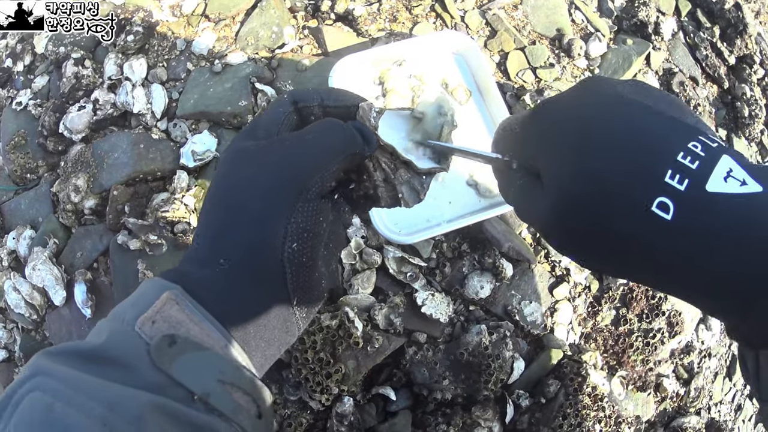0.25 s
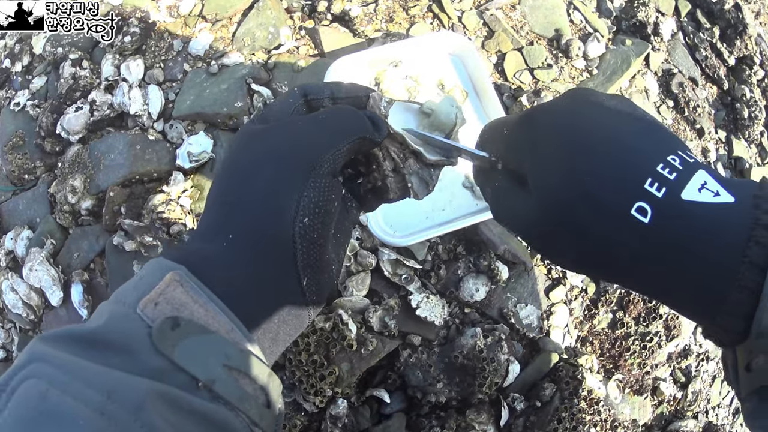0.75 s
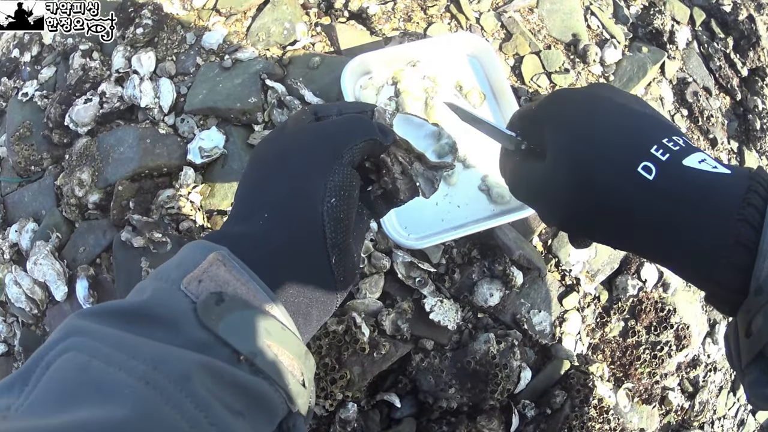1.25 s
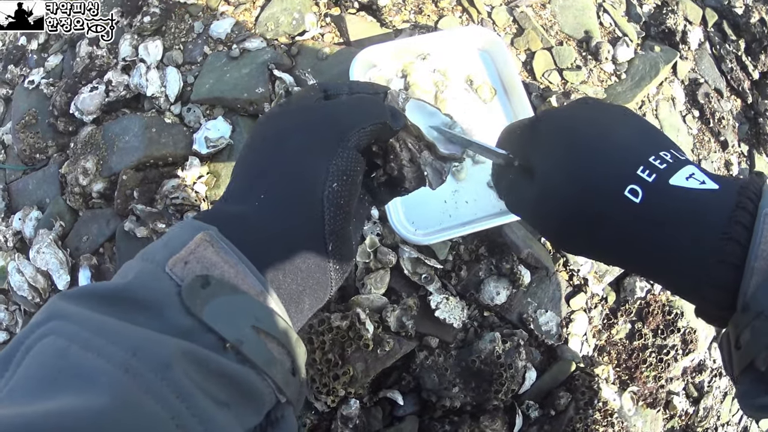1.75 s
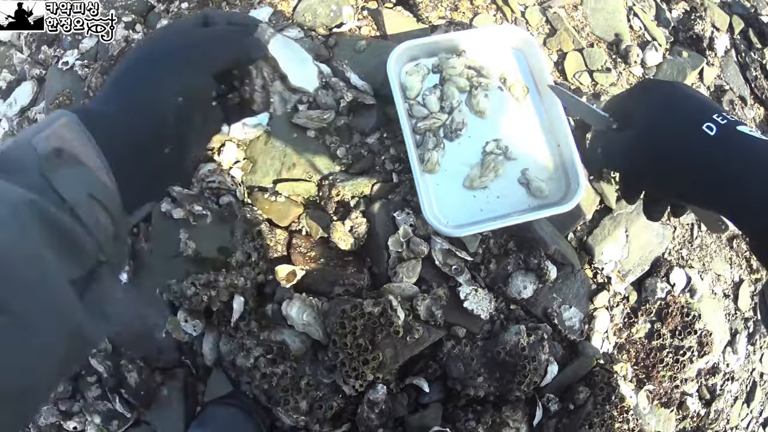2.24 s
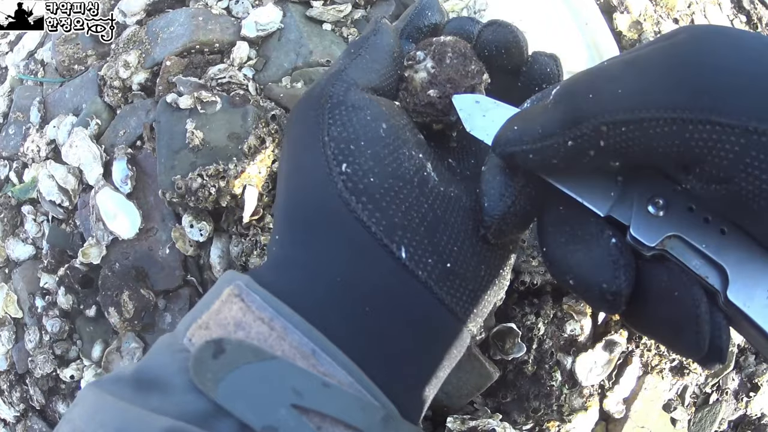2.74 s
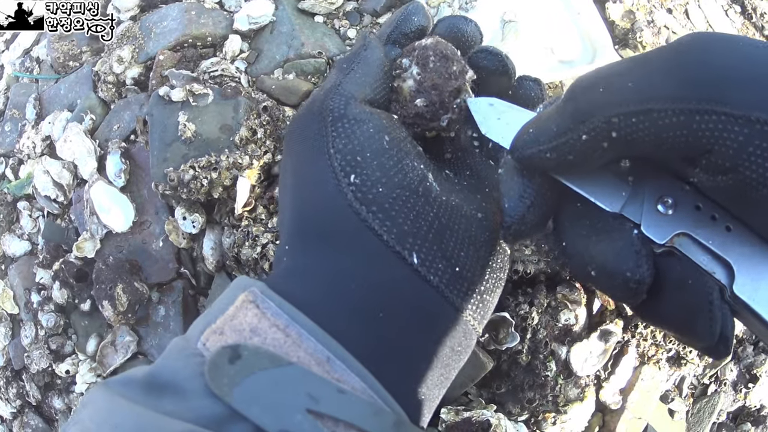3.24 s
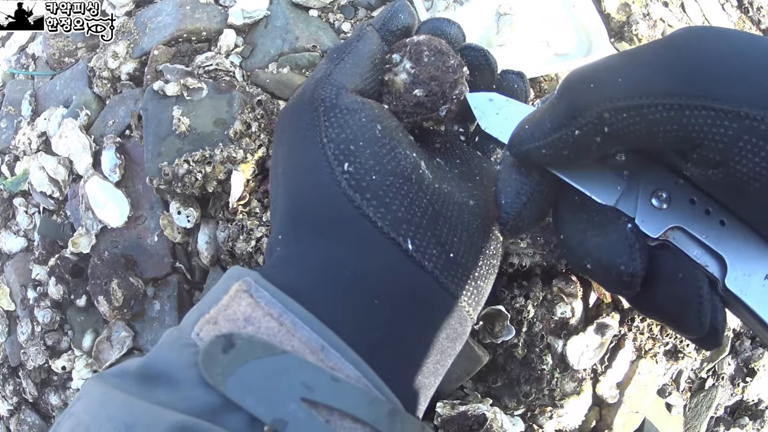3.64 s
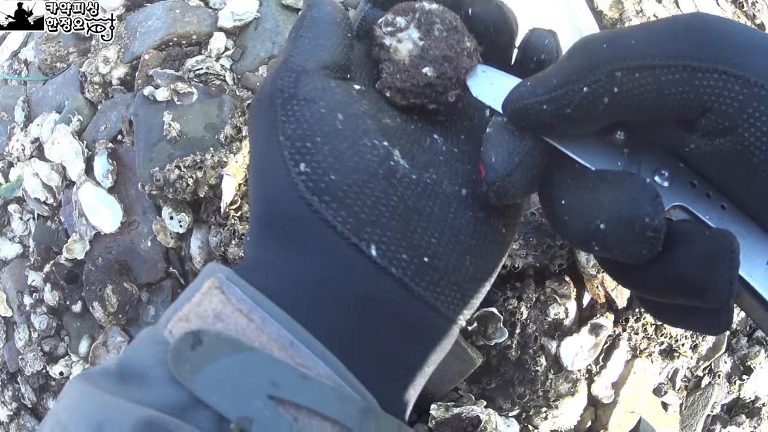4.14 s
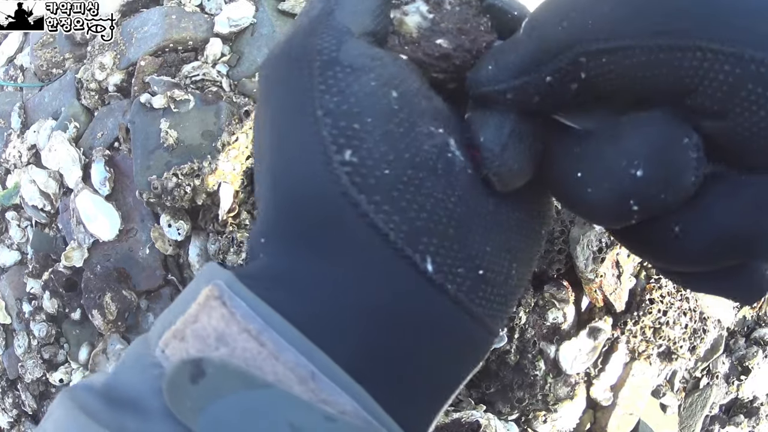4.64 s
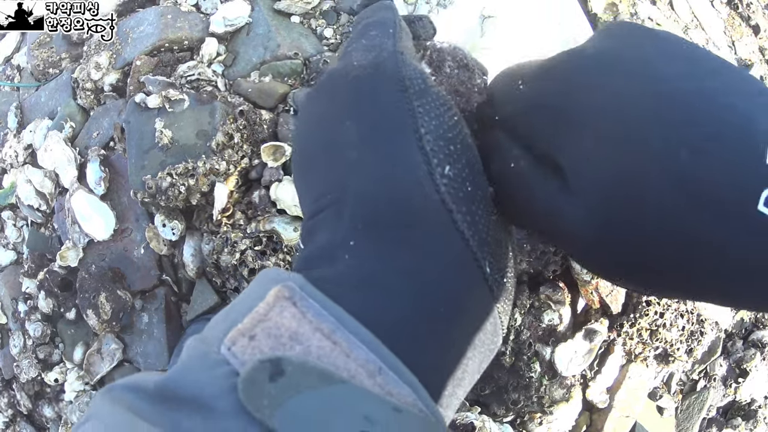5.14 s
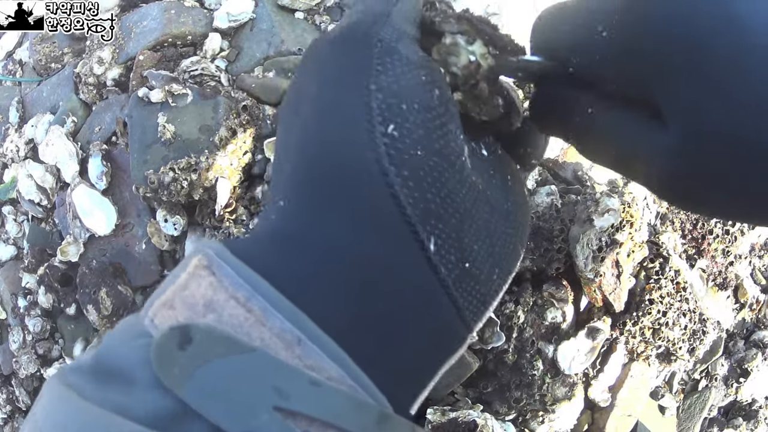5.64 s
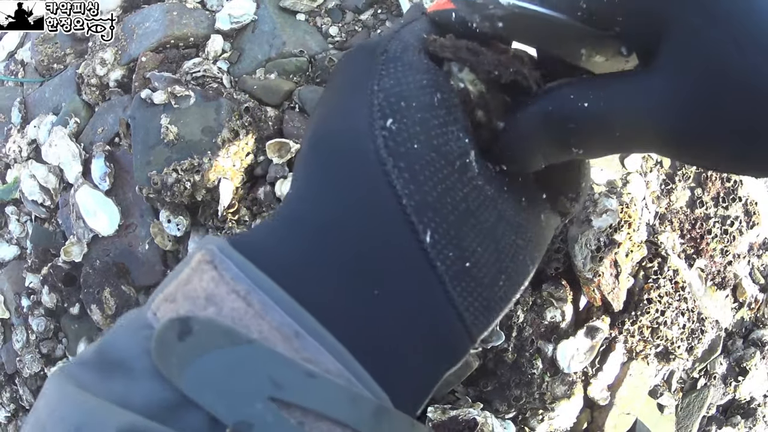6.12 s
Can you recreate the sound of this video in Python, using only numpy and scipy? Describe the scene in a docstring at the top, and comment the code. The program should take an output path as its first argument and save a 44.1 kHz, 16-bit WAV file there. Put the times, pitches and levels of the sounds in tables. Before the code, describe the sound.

On a quiet rocky shore, heard very close, a blade scrapes and taps inside an open oyster shell in bright, irregular bursts. Wet meat pats softly into a plastic tub. A stiff sleeve swishes by with a brief rising zip. After a near-silent pause, the knife tip grinds another shell's edge, with brittle cracks and gritty crumbling growing dense. Low outdoor rumble, thin hiss and a faint engine hum lie behind.

```python
"""A knife blade scrapes and taps inside an open oyster shell, close to a body-worn camera on a quiet rocky shore.
Bits of wet meat slap into a plastic tub, then a sleeve swishes past as the hand fetches the next oyster, whose
brittle lip cracks and crumbles under the knife tip. Knife sounds are sharp pushes or friction slips sent through
shell resonances; the tub is a set of damped modes; sleeve and gloves are moving noise, the sleeve with a rising zip.
Behind lie short scatter from nearby stones, a low outdoor rumble with thin hiss, and the hum of a far engine."""
import sys
import numpy as np
from scipy import signal
from scipy.fft import rfft, irfft, next_fast_len
from scipy.io import wavfile
from scipy.ndimage import uniform_filter1d, map_coordinates

SR = 44100
rng = np.random.default_rng(int(sys.argv[2]) if len(sys.argv) > 2 else 0)


def inscribe(sig):
    """Save sig as 16-bit PCM at rate SR to the path in sys.argv[1].

    A 1-D sig is mono; a 2-D sig holds one channel per row.
    Samples are clipped to [-1, 1] before scaling.
    """
    pcm = np.round(np.clip(np.atleast_2d(sig).T, -1, 1) * 32767)
    wavfile.write(sys.argv[1], SR, pcm.astype(np.int16))


N = 281358
TIME = np.arange(N) / SR

# the tip crushes the lip: hardest_push_s, length_s, level_db (ahead of the crumble's cut), bright_db, ring_hz
GRINDS = [(3.21, .115, -42.5, -3.5, 2090), (3.33, .04, -37.5, -0.5, 4950), (3.39, .11, -44, -8, 4460),
          (3.5, .04, -45.5, -2.5, 3650), (3.803, .03, -40, -9, 4540), (3.868, .045, -43, -10, 830),
          (3.945, .052, -39, -5, 2800), (4.02, .09, -38, -2, 4290), (4.155, .08, -42.5, -5.5, 2770),
          (4.32, .12, -36.5, -5, 5300), (4.393, .024, -28.5, -7, 5360), (4.445, .13, -32.5, -2, 5040),
          (4.52, .05, -36.5, -1, 5800), (4.631, .09, -27, 0, 2370), (4.845, .09, -38, -5, 1420),
          (4.93, .15, -42, -1, 2590), (5.07, 0.069, -30.5, -0.5, 2520), (5.103, .024, -24.5, -1.5, 1660),
          (5.316, .085, -27.5, -1.5, 1830), (5.39, .1, -31.5, -1.5, 2030), (5.504, .028, -31.5, -3.5, 3650),
          (5.574, .042, -21, -4.5, 1857), (5.616, .062, -31, -7, 5950), (5.712, .082, -33.5, -5, 6200),
          (5.768, .036, -35, -9.5, 1740), (5.832, 0.02, -29, 4, 3460), (6.17, .1, -36, -7.5, 4980),
          (6.305, .038, -35, -3, 1520), (6.35, .056, -25, -0.5, 7860)]
# body colour of the closed oyster: frequency_hz, gain_db
SOLID = [(380, -7.5), (750, -3), (1000, -2), (1500, 1), (2000, 2.5), (2700, 3), (3500, -2.5), (4100, 1),
         (4600, -0.5), (5500, 0.5), (6500, -1), (8200, 3), (11000, -1.5)]
# wet gloves shift on the shell: time_s, grip_db (ahead of the gains of rustle and grit)
GRIP = [(0, -54), (1, -52.5), (1.3, -57), (3.45, -54), (3.72, -62), (4.2, -47), (4.45, -42), (4.57, -48),
        (4.72, -43.5), (5.17, -41.5), (5.55, -48), (6, -49), (6.38, -39)]


def amp(db):
    """Decibels to gain."""
    return 10 ** (np.asarray(db) / 20)


def unit(x):
    """Scale to rms 1."""
    return x / np.sqrt(np.mean(x ** 2) + 1e-20)


def along(points, hz):
    """(Hz, value) points read on a log frequency axis."""
    point_hz, value = np.transpose(points)
    return np.interp(np.log(hz + 1), np.log(point_hz + 1), value)


def curves(rows):
    """One value per sample for each column after the time."""
    s, *columns = np.transpose(rows)
    return [np.interp(TIME, s, column) for column in columns]


def wobble(rate):
    """A smooth random curve, rate knots a second."""
    knots = rng.standard_normal(int(N * rate / SR) + 4)
    return map_coordinates(knots, [TIME * rate])


def filtered(x, gain):
    """x times a gain that depends on frequency."""
    size = next_fast_len(N + 8192)
    hz = np.fft.rfftfreq(size, 1 / SR)
    return irfft(rfft(x, size) * gain(hz), size)[..., :N]


def noise(spectrum, side_db):
    """Coloured stereo noise of rms 1, wider with more side_db."""
    mid, side = filtered(rng.standard_normal((2, N)), lambda hz: amp(along(spectrum, hz)))
    side = amp(side_db) * side
    return unit(np.array([mid + side, mid - side]))


def pan(left_db):
    """Channel gains for a level lead of the left side."""
    return amp([[left_db / 2], [-left_db / 2]])


def add(track, s, sound):
    """Mix a sound into a track at time s."""
    part = track[max(round(s * SR), 0):][:len(sound)]
    part += sound[:len(part)]


def shell(force, body, knock_db, bright_db, ring_hz, ring_db, width_hz, ripple_db, size=2048):
    """The shell answers a force with its body colour, one main ring and lesser modes that differ from spot to spot."""
    hz = np.fft.rfftfreq(size, 1 / SR)
    contact = [(100, -45), (430, knock_db - 14.0), (800, knock_db - 3.0), (1400, knock_db + 0.5),
               (2400, -3.5), (5800, -1), (8000, bright_db), (11000, bright_db - 1.0), (13000, -4.5)]
    resonance = amp(ring_db) / np.hypot(1, 2 * (hz - ring_hz) / width_hz) ** 2
    ring = 20 * np.log10(1 + resonance)
    lesser = ripple_db * map_coordinates(rng.standard_normal(size), [hz / width_hz * 2])
    # folding the cepstrum makes the answer causal, with minimum phase
    cepstrum = irfft(np.log(amp(along(body, hz) + along(contact, hz) + ring + lesser)))
    cepstrum[1:size // 2] *= 2
    cepstrum[size // 2 + 1:] = 0
    # bending waves carry the treble a little ahead of the bass
    bending = np.exp(-.22j * np.sqrt(hz))
    answer = irfft(np.exp(rfft(cepstrum)) * bending)
    return signal.fftconvolve(force, answer)


def blow(chatter, t60, size=1024):
    """One sharp push with quickly dying chatter of the contact."""
    tail = rng.standard_normal(size) * amp(-60 * np.arange(size) / SR / t60)
    force = chatter * tail / np.linalg.norm(tail)
    force[0] += 1
    return force


def at_level(click, db):
    """Give a click its rms level, its energy counted over 5 ms."""
    return click / np.linalg.norm(click) * amp(db) * np.sqrt(.005 * SR)


def strokes(rows, body, rise_share, knock_db, knock_per_bright, slips_per_s, spread_db, rub, ring_db, width_hz):
    """Tiny slips over a smooth rub swell and fade with the push; the brighter a stroke, the less it knocks."""
    out = np.zeros(N)
    for s, length, db, bright_db, ring_hz in rows:
        rise, fall = length * rise_share, length * (1 - rise_share)
        start = max(s - 1.25 * rise, 0)
        t = np.arange(start, s + 1.25 * fall, 1 / SR) - s
        push = np.exp(-(2 * t / np.where(t < 0, rise, fall)) ** 2)
        chance, strength = rng.random((2, len(t)))
        grit, smooth = rng.standard_normal((2, len(t)))
        slips = (chance < slips_per_s / SR) * np.sign(grit) * amp(spread_db * strength)
        force = push * (unit(slips) + rub * smooth)
        colour = knock_db - knock_per_bright * bright_db, bright_db, ring_hz
        sound = shell(force, body, *colour, ring_db, width_hz, ripple_db=1)
        # the level holds at the hardest push
        add(out, start, amp(db) * sound * np.linalg.norm(push) / np.linalg.norm(sound))
    return out


def shifting(x, depth_db, span_hz, span_s, size):
    """As the contact moves, patches of the spectrum swell and fade."""
    hz, t, spectrum = signal.stft(x, SR, nperseg=size)
    field = rng.standard_normal((size, len(t)))
    places = np.meshgrid(hz / span_hz, t / span_s, indexing="ij")
    patches = map_coordinates(field, places, order=1, mode="mirror")
    return signal.istft(spectrum * unit(amp(depth_db * patches)), SR, nperseg=size)[1][:N]


def cleaning():
    """The blade scrapes the meat loose by friction and chatters against the open shell in short blows."""
    # the blade hits the open shell: start_s, level_db, knock_db, bright_db, ring_hz
    taps = [(0.4014, -26, 0, 3, 5340), (0.4983, -26, -2, -3, 3840), (0.5608, -26.5, 2, 4, 10100),
            (0.6613, -22, 1, -3, 4400), (0.7723, -26, -16, 2, 8000), (0.9401, -22, -5.5, -0.5, 9400),
            (0.947, -26, -4, 1, 5130), (1.3777, -26, 5.5, -14, 2740), (1.418, -30.5, 10, 2, 3680),
            (1.487, -20, 0, 0.5, 5540), (1.756, -26, -7, 3, 10300), (1.8582, -26, 5, 2.5, 9600),
            (1.9899, -24.5, -4, 0, 9050)]
    # the blade slides over the inner shell: hardest_push_s, length_s, level_db, bright_db, ring_hz
    scrapes = [(0.08, .14, -37, -0.5, 2760), (0.137, 0.069, -31, -1, 7330), (0.222, .125, -36, -1.5, 2630),
               (0.462, 0.067, -34.5, -8.5, 2800), (0.488, 0.042, -22.5, 2.5, 4220),
               (0.688, 0.083, -40, -7.5, 7560), (0.752, 0.084, -31.5, 3.5, 3960),
               (0.883, 0.074, -22.5, 3, 10300), (0.93, .1, -41, -1, 7800), (1.397, 0.039, -27.5, -1, 7760),
               (1.428, .036, -28, 2, 4570), (1.452, 0.071, -36, 0, 4600), (1.481, .03, -27, 2, 9620),
               (1.596, 0.041, -37.5, -0.5, 3730), (1.752, 0.075, -25.5, -3, 8400),
               (1.803, 0.13, -27, 6, 4670), (1.863, 0.03, -25, -1.5, 9560)]
    # body colour of the open half shell: frequency_hz, gain_db
    hollow = [(380, 2), (900, -1.5), (1650, -3.5), (2400, 0), (3500, -0.5), (4400, 3), (5000, -2),
              (5600, 0.5), (7100, -0.5), (8100, -1), (11000, -2)]
    scrape = strokes(scrapes, hollow, rise_share=.52, knock_db=-6.5, knock_per_bright=1.0,
                     slips_per_s=2600, spread_db=17.5, rub=0.66, ring_db=8, width_hz=506)
    out = shifting(scrape, depth_db=5, span_hz=280, span_s=.022, size=256)
    for s, db, *colour in taps:
        force = blow(chatter=8.0, t60=0.019)
        tap = shell(force, hollow, *colour, ring_db=9, width_hz=520, ripple_db=3.0)
        add(out, s, at_level(tap, db))
    return out


def prying():
    """The tip grinds into the layered lip by friction, and flakes large and small snap off."""
    # large flakes snap off the closed oyster: start_s, level_db, knock_db, bright_db, ring_hz
    cracks = [(2.7825, -50.5, -20, 1, 6470), (3.073, -49.5, -6, -5, 1580), (3.2232, -44, -2, 3, 7760),
              (3.2314, -37.5, -1, -21, 2000), (3.308, -37, -1, -25, 2120), (3.3288, -23.5, -1, -37, 2880),
              (3.3327, -33.5, -0.5, -23, 715), (3.4991, -38, -7, -26, 4450), (3.531, -43.5, 18, 1, 3720),
              (3.803, -39.5, 10, 2, 4540), (3.8665, -22.5, -12, -9, 5100), (3.8719, -24.5, -7, -7, 3100),
              (3.9084, -42.5, 9, 1, 2780), (4.2567, -37, 1, -20, 2620), (4.395, -24.5, 5.5, 1.5, 7650),
              (4.412, -30, -5, 2.5, 6760), (4.4475, -25.5, -8, -9, 4640), (4.5218, -31.5, -2, 3, 6830),
              (4.6595, -33, -20, -3, 5370), (4.7421, -26, -8, -8, 7000), (4.773, -22.5, -2.5, -8, 5700),
              (4.7816, -25.5, -2.5, -10, 5670), (4.8001, -24, -13, -8, 2450), (4.9054, -24, -16, -9, 2800),
              (4.915, -21, -9.5, -11, 3000), (4.9661, -28.5, -6, -13, 3240), (4.9843, -22.5, -7, -10, 2750),
              (5.0712, -23, -18, 2, 5640), (5.1022, -22.5, -20, -1, 8000), (5.2199, -26.5, 0, -18, 7600),
              (5.2847, -28, 10.5, -4, 4900), (5.303, -25, 7, -19, 5600), (5.3148, -25.5, -9, -2, 5630),
              (5.33, -22.5, -0.5, -2, 1420), (5.345, -22, -13, -9, 1480), (5.3624, -28, 1, -2, 4860),
              (5.4061, -28.5, -13, 3, 3930), (5.4296, -29.5, 6.5, 1, 1860), (5.506, -30, -11, -8, 9900),
              (5.5669, -21.5, -11, 2, 6200), (5.5779, -26, 22, 3, 1200), (5.617, -21, 4, -5.5, 4020),
              (5.8317, -29.5, 0.5, -15, 6500), (6.1082, -41, 6, -6, 1460), (6.1765, -32, 2, -10, 1230),
              (6.2075, -51, 0, -7, 9370), (6.3444, -21.5, 5, 2, 8400), (6.357, -25.5, -5.5, -8, 1540),
              (6.361, -22.5, -1, 0, 1570), (6.367, -23.5, -11, -2, 1620)]
    crumble = strokes(GRINDS, SOLID, rise_share=.51, knock_db=0.76, knock_per_bright=0.23,
                      slips_per_s=750, spread_db=20.5, rub=0.42, ring_db=4.0, width_hz=790)
    out = amp(-2.2) * shifting(crumble, depth_db=5, span_hz=800, span_s=.004, size=128)
    for s, db, *colour in [*cracks, *flakes(crumble, count=64)]:
        add(out, s, snap(db, *colour))
    return out


def snap(db, *colour):
    """One flake breaks: a dry click that the gloved hand damps."""
    force = blow(chatter=0.63, t60=0.015)
    click = shell(force, SOLID, *colour, ring_db=11, width_hz=916, ripple_db=2.0)
    return at_level(click, db)


def flakes(crumble, count):
    """Small flakes snap more often and louder the harder the tip grinds and the hand grips."""
    over_effort_db, scatter_db = 2, 2
    middle_ring_hz, ring_spread = 3580, 0.413  # the spread is in natural-log units
    grip_db, = curves(GRIP)
    held = amp(grip_db - 1.5) * (TIME > GRINDS[0][0])
    grinding_power = np.abs(uniform_filter1d(crumble ** 2, SR // 20))  # averaged over 50 ms
    effort = np.sqrt(grinding_power + held ** 2)
    wear = np.cumsum(np.sqrt(effort))
    # one flake at a random point in each equal share of the wear
    shares = (np.arange(count) + rng.random(count)) / count
    when = np.searchsorted(wear / wear[-1], shares)
    rows = []
    for i, (size, spot) in zip(when, rng.standard_normal((count, 2))):
        level_db = 20 * np.log10(effort[i] + 1e-9) + over_effort_db + scatter_db * size
        ring_hz = middle_ring_hz * np.exp(ring_spread * spot)
        rows.append((i / SR, level_db, -2, -3, ring_hz))  # start, level, knock, bright, ring
    return rows


def tub():
    """Soft, wet landings slap the tub and stir its damped modes; so small a tub radiates little bass."""
    # bits of oyster land in the tub: start_s, level_db (ahead of the bass cut)
    drops = [(0.54, -51), (0.561, -42), (0.577, -46.5), (1.988, -33), (2.001, -38.5)]
    # modes of the plastic tub: frequency_hz, level_db, t60_s
    modes = [(566, -12.5, 0.077), (805, -1.5, 0.055), (960, 4.5, 0.02), (1110, 4.5, 0.019),
             (1450, -6.5, 0.046), (1630, -5.5, 0.022), (2980, -5, 0.037)]
    out, t = np.zeros(N), np.arange(SR // 8) / SR
    ring = np.zeros(len(t))
    for k, (hz, level_db, t60) in enumerate(modes):
        # neighbouring modes start in opposite directions
        ring += (-1) ** k * amp(level_db - 60 * t / t60) * np.sin(2 * np.pi * hz * t)
    for s, db in drops:
        splat = signal.fftconvolve(blow(chatter=1.3, t60=0.05, size=4096), ring)
        add(out, s, at_level(splat, db))
    return filtered(out, lambda hz: amp(along([(100, -40), (500, 0)], hz)))


def sleeve():
    """Stiff cloth flaps and rubs; its uneven ribs give a rough, broken, rising zip with one overtone."""
    # the sleeve brushes past: time_s, flapping_cloth_db, rubbing_weave_db (ahead of trim and wobble)
    passing = [(2.06, -79.5, -77), (2.12, -62, -51.5), (2.242, -40, -40), (2.264, -42.5, -29),
               (2.3, -35, -41), (2.358, -42, -30), (2.6, -53, -48.5), (2.85, -76, -61.5), (2.95, -89, -88)]
    # the ribs sing higher as the arm speeds up: time_s, pitch_hz (ahead of jitter), gain_db
    zip_path = [(2.26, 2383, -84), (2.305, 2587, -36), (2.35, 2856, -36), (2.405, 3520, -34),
                (2.44, 3560, -39), (2.49, 3880, -77)]
    # colour of the flapping cloth: frequency_hz, relative_db
    cloth_colour = [(100, -23), (300, -10.5), (800, -4.5), (1500, -9.5), (2500, -11.5), (6000, -34)]
    # colour of the rubbing weave: frequency_hz, relative_db
    weave_colour = [(700, -66), (2500, -6), (4500, -2), (7500, -3.5), (9500, -2), (11000, -6.5)]
    cloth_db, weave_db = curves(passing)
    zip_hz, zip_db = curves(zip_path)
    cloth = amp(cloth_db - 0.5 + 1.94 * wobble(120)) * noise(cloth_colour, side_db=-2)
    weave = amp(weave_db + 1.1 * wobble(220)) * noise(weave_colour, side_db=-7.5)
    weave = np.array([shifting(side, depth_db=4, span_hz=400, span_s=.025, size=256) for side in weave])
    uneven_hz = zip_hz * (1 + .1 * wobble(2200) + .03 * wobble(90))
    phase = 2 * np.pi * np.cumsum(uneven_hz) / SR
    broken = unit(amp(3.6 * wobble(300)))
    ribs = (np.sin(phase) + amp(-0.5) * np.sin(2 * phase)) * broken
    moving = (TIME > passing[0][0]) & (TIME < passing[-1][0])
    return pan(2.2) * moving * (cloth + weave + amp(zip_db) * ribs)


def gloves():
    """The grip rustles faintly as wavering noise; a firmer grip also rolls wet grit over the shell in random slips."""
    # colour of the glove rustle: frequency_hz, relative_db
    glove_colour = [(300, -12.5), (700, -2), (1400, 1), (2800, -1), (6000, -3.5), (11000, -4)]
    grip_db, = curves(GRIP)
    flutter = unit(amp(4.5 * wobble(40) + 1.05 * wobble(900)))
    rustle = flutter * noise(glove_colour, side_db=-3.5)
    slips = (rng.random(N) < 220 / SR) * rng.standard_normal(N)  # about 220 a second
    grit = shell(slips, SOLID, knock_db=-3, bright_db=-4, ring_hz=2630, ring_db=-5.0, width_hz=916, ripple_db=3)
    grit = shifting(unit(grit[:N]), depth_db=5, span_hz=900, span_s=.005, size=128)
    firmness = amp((grip_db - grip_db.max()) / 2)
    return pan(-1.9) * amp(grip_db) * (amp(-0.5) * rustle + amp(-2.0) * firmness * grit)


def rocks(x, t60, size=4096):
    """Nearby stones scatter a short noise-like answer, different on each side."""
    t = np.arange(size) / SR
    build_up = 1 - np.exp(-t / 0.0026)
    tail = rng.standard_normal((2, size)) * amp(-60 * t / t60) * build_up
    return signal.fftconvolve(x[None], tail / np.linalg.norm(tail[0]), axes=1)[:, :N]


def shore():
    """Low outdoor rumble nearly alike on both sides, wider thin hiss and a distant wavering hum of sine tones."""
    # colour of the outdoor air: frequency_hz, relative_db
    air_colour = [(20, -19), (40, -7.5), (65, 3), (100, 3.5), (160, 4.5), (230, 2), (330, -2.5),
                  (480, -10.5), (900, -11), (1800, -23.5), (4000, -23), (11000, -18.5)]
    # tones of a far engine: frequency_hz, relative_db (ahead of the wavering)
    engine = [(68, -17), (97, -12.5), (152, -11), (269.5, -1)]
    # how strongly the hum carries: time_s, gain_db
    carry = [(0, -64), (1.3, -61.5), (3.5, -56), (4.1, -65.5), (5.1, -65.5), (5.3, -58.5), (6.38, -57.5)]
    air = amp(-55.0 + 0.36 * wobble(14.0)) * noise(air_colour, side_db=-3.5)
    mid = air.mean(axis=0)
    # narrow in the bass, wide above
    width = [(100, -18.5), (400, 3.5), (2000, 3.5)]
    air = mid + filtered(air - mid, lambda hz: amp(along(width, hz)))
    carry_db, = curves(carry)
    hum = np.zeros(N)
    for hz, db in engine:
        hum += amp(db + 2.8 * wobble(7.3)) * np.sin(2 * np.pi * hz * TIME + .5 * wobble(8.7))
    return air + amp(carry_db) * hum


def scene():
    """The knife work, slightly right of centre, with its scatter off the stones, the clothing and the shore."""
    work = cleaning() + prying() + tub()
    near = work + amp(-12) * rocks(work, t60=0.015) + amp(-25.5) * rocks(work, t60=0.13)
    return pan(-4.0) * near + sleeve() + gloves() + shore()


def record(dry):
    """The camera's band limit: from 11050 Hz up the level falls 1 dB every 12 Hz, by 120 dB at most."""
    top_hz = 11150
    return filtered(dry, lambda hz: amp(-np.clip((hz - top_hz + 100) / 12, 0, 120)))


dry = scene()
out = record(dry)
inscribe(out)
```